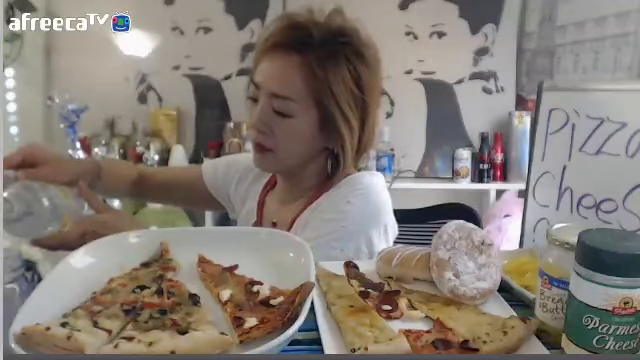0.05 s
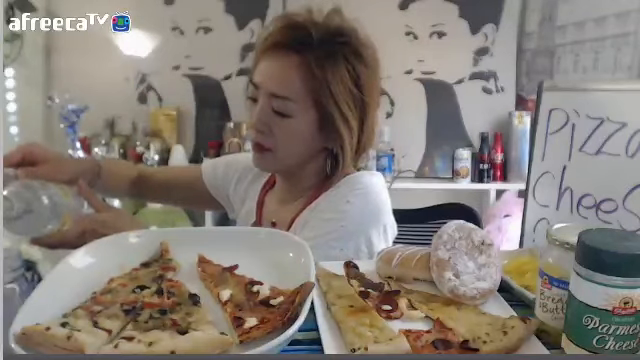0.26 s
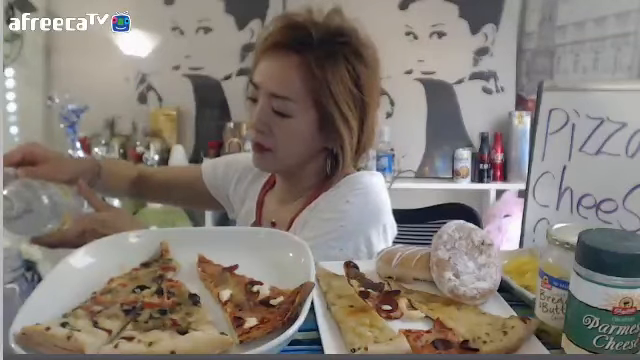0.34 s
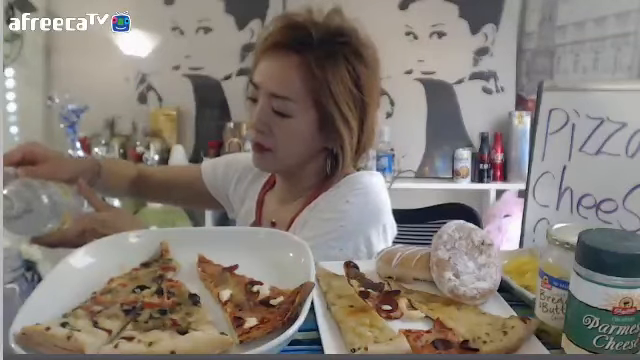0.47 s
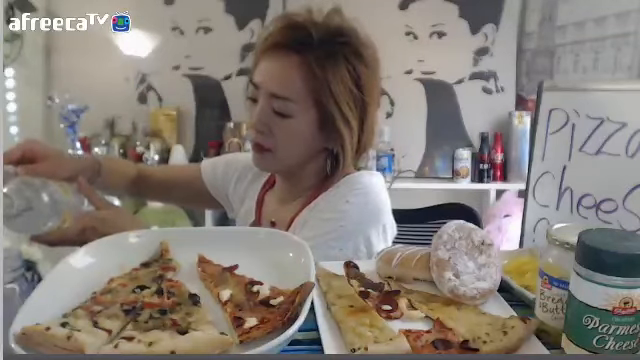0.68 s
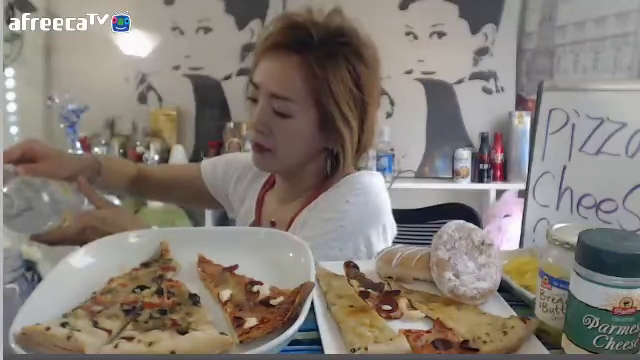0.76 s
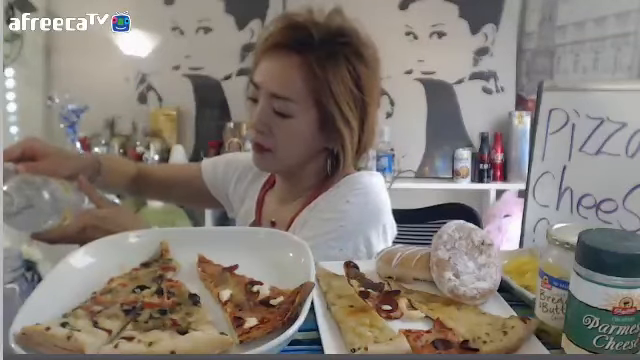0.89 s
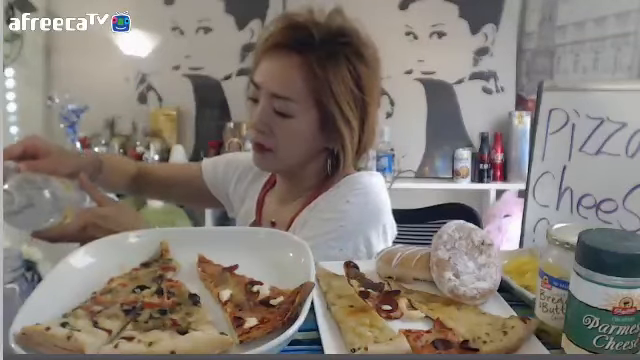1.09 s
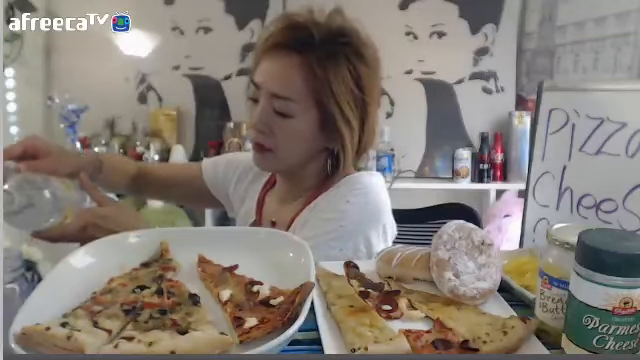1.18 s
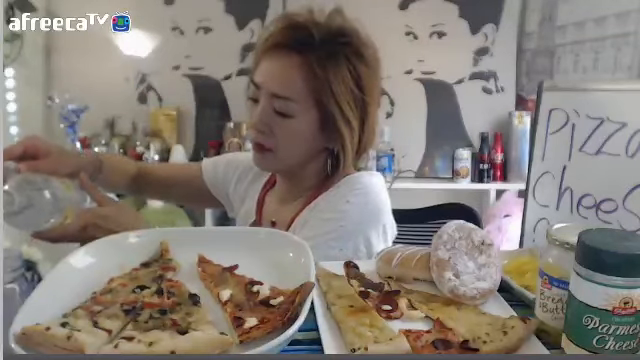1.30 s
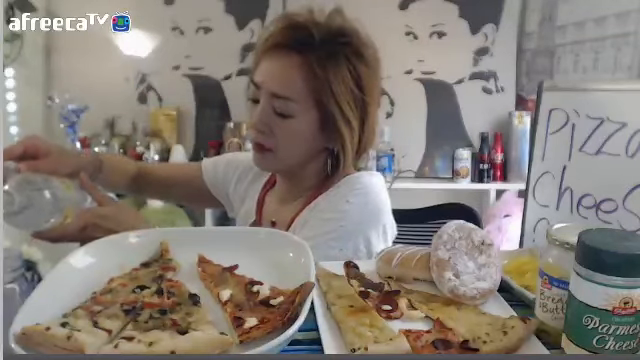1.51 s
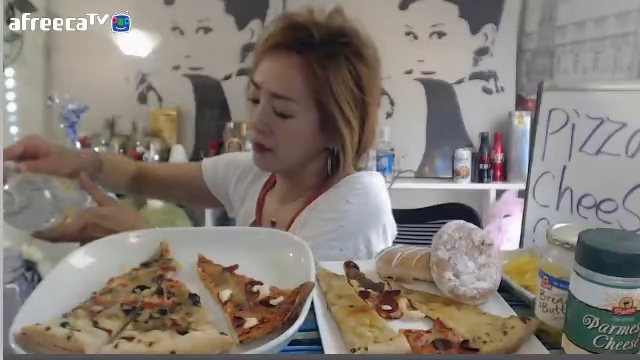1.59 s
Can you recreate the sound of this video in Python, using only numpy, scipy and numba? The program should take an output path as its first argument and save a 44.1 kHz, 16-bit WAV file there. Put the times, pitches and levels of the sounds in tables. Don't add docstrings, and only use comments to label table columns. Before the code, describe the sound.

Fizzy drink poured over ice in a glass, cubes clattering loudly, then settling in small ticks

```python
import sys
import numpy as np
from scipy import signal
from scipy.fft import rfft, irfft
from scipy.io import wavfile
from scipy.ndimage import uniform_filter1d, minimum_filter1d
from numba import njit

SR = 44100
rng = np.random.default_rng(int(sys.argv[2]) if len(sys.argv) > 2 else 0)


def voltage_ratio(decibels):
    exponent = np.asarray(decibels, float) / 20
    return 10 ** exponent


def log_audio(samples):
    frames = np.atleast_2d(samples).T
    limited = np.clip(frames, -1, 1)
    pcm = np.round(limited * 32767).astype(np.int16)
    wavfile.write(sys.argv[1], SR, pcm)


N = 72765


def level(x, db):
    return x * voltage_ratio(db) / np.sqrt(np.mean(x ** 2))


def walk(rate):
    hold = int(SR / rate)
    steps = np.repeat(rng.standard_normal(N // hold + 1), hold)
    return 1.2 * uniform_filter1d(steps, hold)[:N]


@njit
def svf(x, hz, width):
    y, b, l = np.empty(len(x)), 0., 0.
    for i in range(len(x)):
        g, k = np.tan(np.pi * hz[i] / SR), width / hz[i]
        v = (b + g * (x[i] - l)) / (1 + g * (g + k))
        b, l, y[i] = 2 * v - b, l + 2 * g * v, k * v
    return y


def band(x, hz, width):
    return svf(x, np.full(len(x), 1. * hz), 1. * width)


@njit
def rings(at, hz, t60, size, rise, n):
    y = np.zeros(n)
    for k in range(len(at)):
        turn = np.exp(2j * np.pi * hz[k] / SR - np.log(1000) / (t60[k] * SR))
        z = size[k] + 0j
        fade, e = np.exp(-1 / (rise * SR)), 1.
        for i in range(int(at[k] * SR), min(n, int((at[k] + t60[k]) * SR))):
            z, e = z * turn, e * fade
            y[i] += z.imag * (1 - e)
    return y


def strike(at, db, modes, scatter_db, detune, rise):
    hz, mode_db, t60 = np.array(modes, float).T
    c = rng.standard_normal((len(at), 2, len(hz)))
    size = voltage_ratio(db[:, None] + mode_db + scatter_db * c[:, 0])
    pitch = hz * (1 + detune * c[:, 1])
    return rings(np.repeat(at, len(hz)), pitch.ravel(), np.tile(t60, len(at)), size.ravel(), rise, N)


def cluster(at, db, hz, octaves, t60, rise, count):
    c = rng.standard_normal((len(at), 3, count))
    c[:, 0, 0] = 0
    f = np.clip(hz[:, None] * 2 ** (octaves * c[:, 0]), 300, 9900)
    start = at[:, None] + .001 * np.abs(c[:, 1])
    size = voltage_ratio(db[:, None] + 2 * c[:, 2]) / np.sqrt(count)
    return rings(start.ravel(), f.ravel(), np.repeat(t60, count), size.ravel(), rise, N)


def bursts(at, db, hz, octaves, t60, rise, skirt_db):
    hz, octaves, t60 = (np.broadcast_to(v, at.shape)[:, None] for v in (hz, octaves, t60))
    n = 4096
    f, u = np.fft.rfftfreq(n, 1 / SR) + 1, np.arange(n) / SR
    off = np.log2(f / hz)
    shape = np.exp(-.5 * (off / octaves) ** 2) + voltage_ratio(skirt_db) * (off > -1)
    x = irfft(rfft(rng.standard_normal((len(at), n))) * shape, n)
    decay = voltage_ratio(db[:, None] - 60 * u / t60)
    x = x / x.std(axis=1)[:, None] * decay * (1 - np.exp(-u / rise)) / 2
    out = np.zeros(N + n)
    np.add.at(out, (at * SR).astype(int)[:, None] + np.arange(n), x)
    return out[:N]


# [t/s, peak level/dB, f/Hz, ring t60/s]
CLACKS = [(0.091, -26.5, 1780, 0.021), (0.216, -28, 1183, 0.085), (0.239, -20, 1135, 0.06),
          (0.269, -9, 1210, 0.048), (0.2935, -1, 1554, 0.021), (0.3045, 0, 1608, 0.04),
          (0.31, -8.5, 1460, 0.0074), (0.319, -2, 1150, 0.025), (0.343, -25, 1270, 0.031),
          (0.386, -9.5, 888, 0.035), (0.458, -23, 1970, 0.018), (0.505, -16.5, 938, 0.029),
          (0.527, -27, 990, 0.03), (0.568, -37, 915, 0.014), (0.672, -40, 2000, 0.059),
          (0.701, -31, 1100, 0.025), (0.81, -38, 1100, 0.075), (0.862, -25.5, 965, 0.033),
          (0.91, -35, 1073, 0.075), (0.942, -29, 1380, 0.056), (1.079, -33, 1220, 0.034),
          (1.093, -33.5, 1070, 0.062), (1.174, -27.5, 840, 0.031), (1.269, -31, 904, 0.062),
          (1.281, -36.5, 948, 0.15), (1.294, -35, 1230, 0.053), (1.342, -31.5, 1190, 0.032),
          (1.544, -25.5, 810, 0.025)]


def clacks():
    at, db, hz, t60 = np.array(CLACKS).T
    ring = cluster(at, db - 6, hz, 0.189, t60, 0.00028, count=5)
    return ring + bursts(at, db - 4, hz, 0.9, 0.82 * t60, 0.00015, -40)


# [t/s, peak level/dB, f/Hz, spread/octaves]
TICKS = [(0.212, -27, 3480, 0.52), (0.2381, -20.5, 2720, 0.8), (0.2512, -24.5, 6030, 0.8),
         (0.2662, -3.5, 3000, 0.5), (0.2926, -6, 2590, 1), (0.3053, -14, 2970, 0.6),
         (0.3177, -18, 4500, 0.5), (0.339, -19.5, 4240, 0.19), (0.3632, -24, 5050, 0.64),
         (0.384, -15, 3520, 0.64), (0.424, -33, 5840, 0.49), (0.4587, -25, 4630, 0.35),
         (0.5033, -15.5, 3490, 0.59), (0.5274, -25.5, 2400, 0.38), (0.5647, -26.5, 2970, 0.77),
         (0.8083, -35.5, 5300, 0.64), (0.8226, -29.5, 4800, 0.67), (0.9083, -42, 4320, 0.77),
         (0.9408, -25, 2900, 1.1), (1.0373, -34, 4000, 0.65), (1.167, -31.5, 4970, 0.42),
         (1.28, -32, 2870, 1), (1.5428, -33.5, 4500, 0.64)]
# [f/Hz, level/dB, t60/s]
GLASS_MODES = [(2884, -8, 0.075), (3930, -21.5, 0.066), (4637, -6, 0.039), (5880, 0, 0.019), ]


def cracks():
    at, db, hz, octaves = np.array(TICKS).T
    ticks = bursts(at, db, hz, octaves, t60=0.023, rise=0.00058, skirt_db=-29)
    spray = bursts(at, db - 14.5, 5160, 0.48, t60=0.056, rise=.002, skirt_db=-29)
    glass = strike(at, db - 12.5, GLASS_MODES, scatter_db=0.93, detune=0.011, rise=0.00052)
    return ticks + spray + glass


# [t/s, peak level/dB, f/Hz, t60/s]
PLINKS = [(0.064, -40, 4170, 0.014), (0.0903, -27, 2250, 0.032), (0.109, -41, 3400, 0.011),
          (0.128, -46, 3200, 0.025), (0.166, -35, 3150, 0.037), (0.1842, -28.5, 2550, 0.016),
          (0.203, -28.5, 2260, 0.024), (0.2133, -23, 2480, 0.018), (0.41, -29.5, 3740, 0.015),
          (0.488, -41, 3930, 0.011), (0.496, -30.5, 2200, 0.017), (0.543, -33, 5800, 0.02),
          (0.568, -29.5, 1720, .026), (0.6357, -42, 4480, 0.011), (0.652, -34, 2650, 0.011),
          (0.6759, -26.5, 4520, 0.023), (0.685, -43, 4870, 0.039), (0.7556, -29, 6160, 0.013),
          (0.8145, -35, 2400, 0.011), (1.038, -33, 4240, 0.017), (1.203, -34, 5700, 0.015),
          (1.3736, -47, 2970, 0.025), (1.484, -39.5, 2400, 0.019)]


def plinks():
    at, db, hz, t60 = np.array(PLINKS).T
    return bursts(at, db + 4.5, hz, 0.12, t60, 0.00036, -35)


# [t/s, peak level/dB, f/Hz, t60/s]
BUMPS = [(0.072, -55, 1130, 0.068), (0.0905, -28, 1240, 0.026), (0.166, -38, 1150, 0.045),
         (0.2655, -20, 700, .06), (0.281, -6.5, 850, 0.018), (0.2945, -3.5, 920, 0.046),
         (0.304, -1, 996, 0.091), (0.313, -14.5, 820, 0.037), (0.341, -12, 784, 0.031),
         (0.3855, -13.5, 622, 0.062), (0.566, -20.5, 700, 0.05), (0.504, -6, 696, 0.028),
         (0.7, -24.5, 448, 0.078), (0.9105, -34, 830, .04), (1.5445, -31, 550, 0.029)]


def bumps():
    at, db, hz, t60 = np.array(BUMPS).T
    return bursts(at, db, hz, 0.21, t60, 0.00021, -39.5)


# [t/s, peak level/dB, knock level/dB, knock f/Hz]
THUDS = [(0.241, -14.5, -12.5, 256), (0.267, -12, -1.5, 240.3), (0.278, -10.5, -3, 361.3),
         (0.292, -13, 2.5, 399.3), (0.318, -20.5, 5, 456), (0.339, -16.5, 3, 240.7),
         (0.384, -17.5, 4.5, 418.8), (0.5, -25.5, 4, 496), (0.502, -12, -7.5, 659),
         (0.527, -26.5, -1.5, 639.5), (0.564, -22.5, -4, 561), (0.597, -25.5, -3, 255),
         (0.672, -27, -3, 225.4), (0.7, -38.5, 4, 412), (0.763, -22.5, -9, 259), (0.828, -25, -9.5, 255),
         (0.912, -23, -10, 432), (1.092, -24, -9, 262), (1.174, -32.5, -5.5, 473),
         (1.267, -26.5, -2.5, 239), (1.279, -23, -8, 443), (1.294, -30, -6, 220), (1.321, -33.5, 2, 469),
         (1.343, -29.5, -2.5, 332), (1.547, -20, -5.5, 250)]
# [f/Hz, level/dB, t60/s]
TABLE_MODES = [(186.2, 2, 0.11), (89, -14, 0.054)]


def table():
    at, db, knock_db, hz = np.array(THUDS).T
    thud = strike(at, db - 3.0, TABLE_MODES, scatter_db=0, detune=0.045, rise=0.0032)
    knock = rings(at, hz, np.full(len(at), 0.18), voltage_ratio(db + knock_db - 5.5), 0.00022, N)
    body = bursts(at, db - 10, 400, 0.52, t60=0.3, rise=0.0075, skirt_db=-50.5)
    rattle = bursts(at, db + knock_db + 1.5, 0.93 * hz, 1.02, t60=0.076, rise=0.00015, skirt_db=-45.5)
    return thud + knock + body + rattle


# [t/s, level/dB]
POUR = [
    (0, -42.5),
    (.2, -64),
    (.25, -31),
    (.31, -16),
    (.35, -47.5),
    (.45, -60),
    (.49, -46),
    (.52, -50),
    (.62, -47.5),
    (1.65, -48),
]
TOP_HZ = 9800


def fizz(t):
    pops_per_s, centre_hz, spread_oct, cycles = 1500, 3042, 0.92, 19
    scatter_db, biggest_db = 6.5, 8.5
    start, luck = rng.random((int(pops_per_s * t[-1]), 2)).T
    hz = centre_hz * 2 ** (spread_oct * rng.standard_normal(len(start)))
    size = voltage_ratio(np.minimum(-scatter_db * np.log(luck), biggest_db)) * (hz < TOP_HZ)
    pops = rings(start * t[-1], hz, 3 * cycles / hz, size, 0.000067, N)
    return level(pops, -7.5) * voltage_ratio(np.interp(t, *np.array(POUR).T))


# [t/s, f/Hz]
COLUMN = [
    (0, 1183),
    (1.0, 1160),
    (1.65, 1130),
]
COLUMN_WIDTH_HZ, SECOND_RATIO = 150, 1.59


def air_column(drink, hz):
    first = voltage_ratio(-9) * svf(drink, hz, 1. * COLUMN_WIDTH_HZ)
    second = voltage_ratio(-12) * svf(drink, hz * SECOND_RATIO, 2. * COLUMN_WIDTH_HZ)
    return 3.2 * (first + second)


# [t/s, level/dB]
STREAM = [(0, -3.5), (.2, -3), (.26, 8.5), (.36, 9), (.42, -2), (.6, -4.5), (.8, -3), (1.0, -4), (1.2, -8),
          (1.35, -10.5), (1.45, -25), (1.65, -17)]


def trickle(t, hz):
    puffs_db = 4.5 * walk(67.46) + np.interp(t, *np.array(STREAM).T)
    noise = rng.standard_normal(N) * voltage_ratio(puffs_db)
    width = 1.35 * COLUMN_WIDTH_HZ

    def narrow(ratio):
        return svf(svf(noise, hz * ratio, width), hz * ratio, width)

    return level(narrow(0.95) + voltage_ratio(-13) * narrow(SECOND_RATIO), -47)


def room(near, t):
    t60_s, dull_hz, n = 0.32, 4120, N // 2
    dulled = signal.lfilter([1], [1, -np.exp(-2 * np.pi * dull_hz / SR)], rng.standard_normal(n))
    tail = level(dulled * voltage_ratio(-60 * t[:n] / t60_s), 0) / np.sqrt(n)
    return voltage_ratio(-17) * signal.fftconvolve(near, tail)[:N]


# [f/Hz, level/dB per Hz]
FLOOR = [(53, -36), (90, 2), (322, -7.5), (477, -7), (720, -29), (1150, -24), (1580, -33), (5750, -25.5),
         (9770, -40.5), (12700, -68), (21500, -120)]


def floor():
    flicker_db = 2
    hz, db = np.array(FLOOR).T
    f = np.fft.rfftfreq(N, 1 / SR) + 1
    spec = rfft(rng.standard_normal(N)) * voltage_ratio(np.interp(np.log(f), np.log(hz), db))
    edges = [0, 500, 1000, 2000, 4000, 6000, 8000, SR]
    total = np.zeros(N)
    for lo, hi in zip(edges, edges[1:]):
        total += irfft(spec * (f > lo) * (f <= hi), N) * voltage_ratio(flicker_db * walk(45))
    return level(total, -44.5)


def building(t):
    hum_hz, rumble_hz, rumble_width_hz = 59.1, 23, 9.6
    hum = voltage_ratio(-39) * np.sin(2 * np.pi * hum_hz * t) + voltage_ratio(-55.5) * np.sin(4 * np.pi * hum_hz * t)
    rumble = band(rng.standard_normal(N), rumble_hz, rumble_width_hz)
    rumble = band(rumble, rumble_hz, rumble_width_hz)
    drift = band(rng.standard_normal(N), 5.1, 16.6)
    return level(rumble, -35) + level(drift, -37) + np.sqrt(2) * hum


def scene():
    t = np.arange(N) / SR
    drink = clacks() + cracks() + plinks() + fizz(t)
    hz = np.interp(t, *np.array(COLUMN).T)
    near = drink + air_column(drink, hz) + bumps() + table() + trickle(t, hz)
    mid = near + room(near, t) + floor() + building(t)
    return np.array([mid, mid])


def thin_treble(x):
    mask_db, mask_db_per_khz, scatter_db, hole_db = -38.5, 9.5, 9.5, -22
    ahead_share, ahead_db = 3, 16
    side_db, side_db_per_khz, side_gaps = -22, 2, .48
    f, _, z = signal.stft(x[0], SR, nperseg=512)
    power = np.abs(z) ** 2
    total = power[f > 300].sum(axis=0)
    loud = 10 * np.log10(-minimum_filter1d(-total, size=5, origin=-1) + 1e-12)
    now = 10 * np.log10(total + 1e-12)
    ahead = np.clip(np.append(loud[2:], loud[-2:]) - now - ahead_db, 0, 8)
    for lo in range(5000, 10000, 700):
        rows = (f >= lo) & (f < lo + 700)
        weak = 10 * np.log10(power[rows].sum(axis=0) + 1e-12)
        weak = weak + scatter_db * rng.standard_normal(len(loud))
        edge = loud + ahead_share * ahead + mask_db + mask_db_per_khz * (lo - 9000) / 1000
        z[rows] *= voltage_ratio(hole_db / (1 + np.exp(np.clip(weak - edge, -30, 30))))
    patches = np.kron(rng.random((65, len(loud) // 6 + 1)) > side_gaps, np.ones((4, 6)))
    patches = patches[:len(f), :len(loud)]
    phase = np.exp(2j * np.pi * rng.random(z.shape))
    side = np.abs(z) * phase * patches * voltage_ratio(side_db + side_db_per_khz * f[:, None] / 1000)
    return signal.istft(np.array([z + side, z - side]), SR, nperseg=512)[1][:, :N]


def band_limit(x):
    return signal.sosfilt(signal.butter(12, 9920, fs=SR, output="sos"), x)


def record(dry):
    gain_db, offset = 0.5, -0.0035
    top_cut = signal.ellip(10, .3, 60, TOP_HZ, fs=SR, output="sos")
    x = signal.sosfilt(top_cut, thin_treble(dry) * voltage_ratio(gain_db))
    mix = np.clip(x + offset, -1, 1)
    return band_limit(mix)


dry = scene()
out = record(dry)
log_audio(out)
```